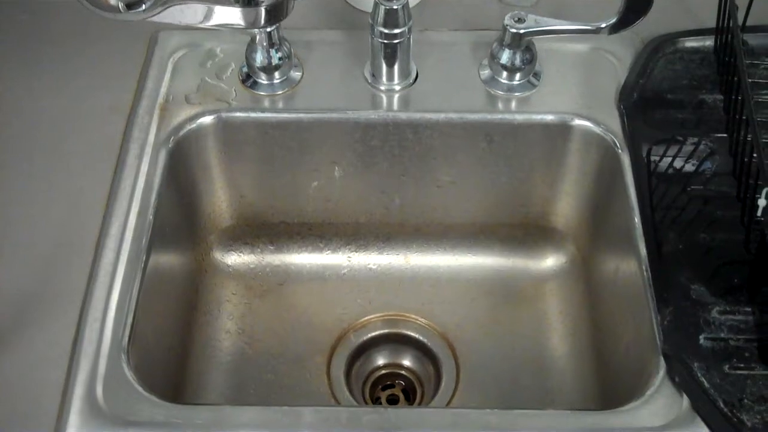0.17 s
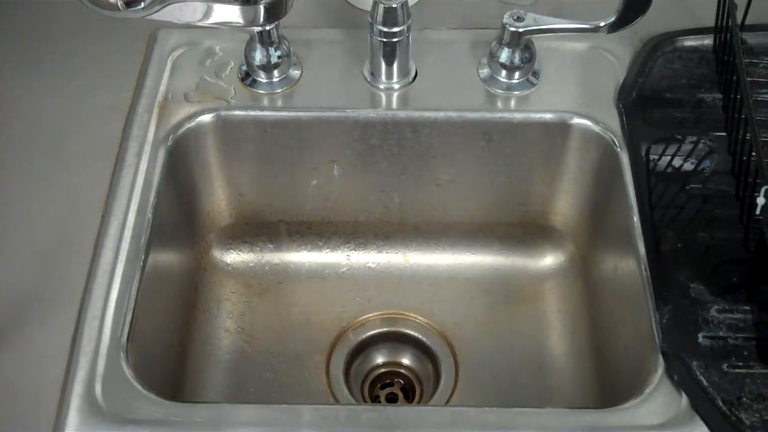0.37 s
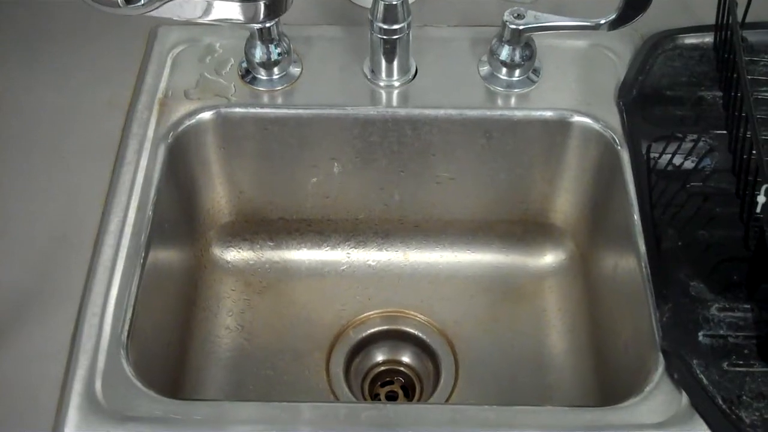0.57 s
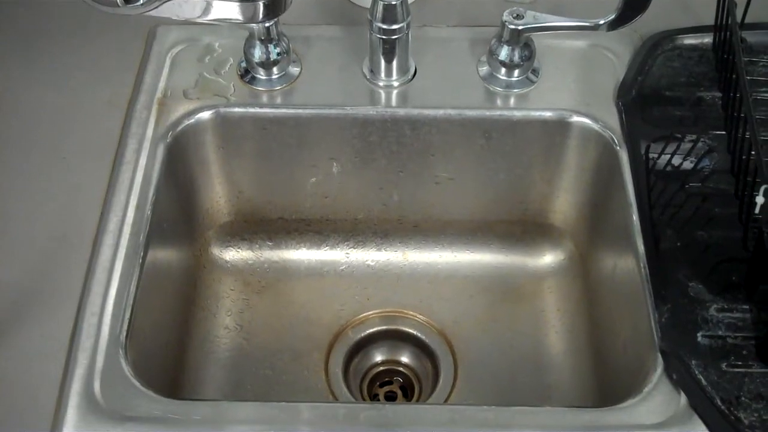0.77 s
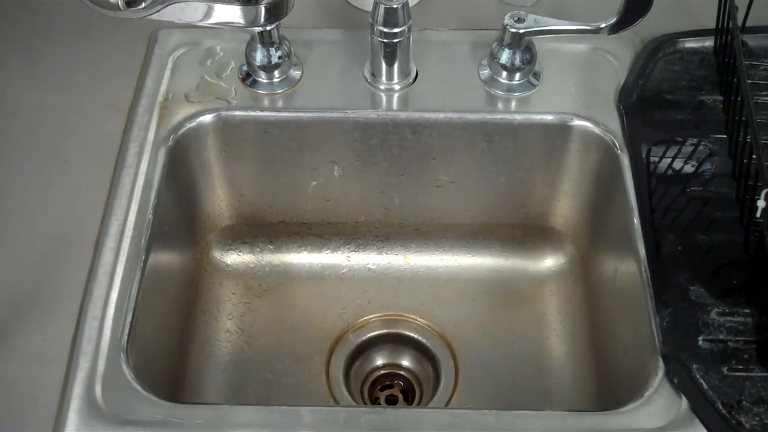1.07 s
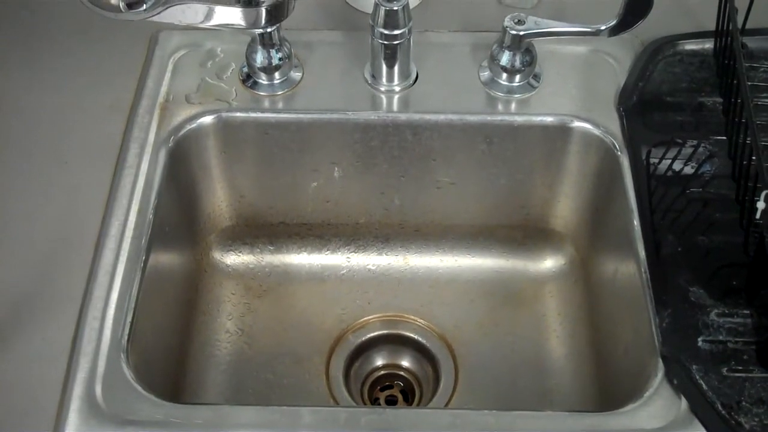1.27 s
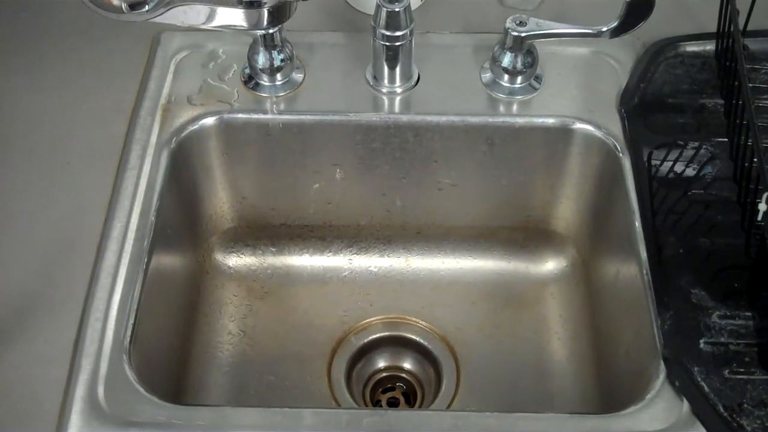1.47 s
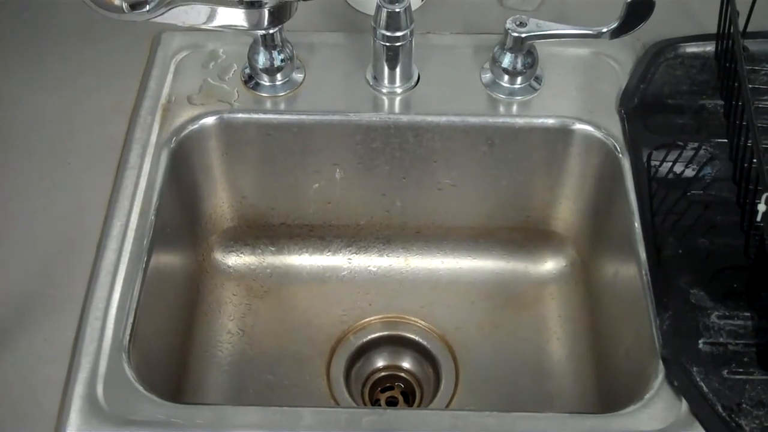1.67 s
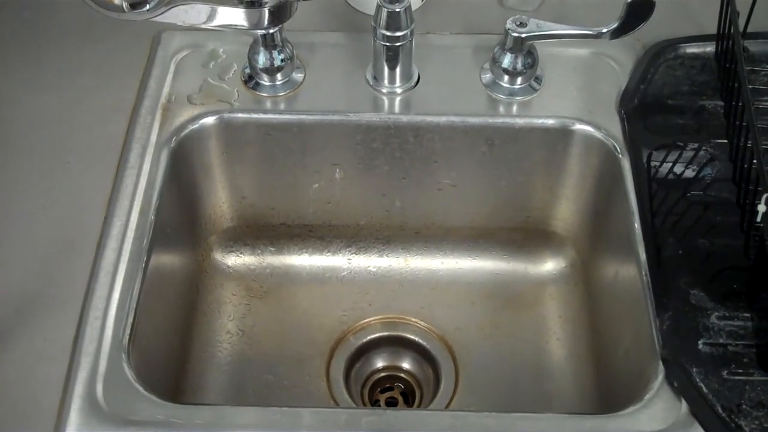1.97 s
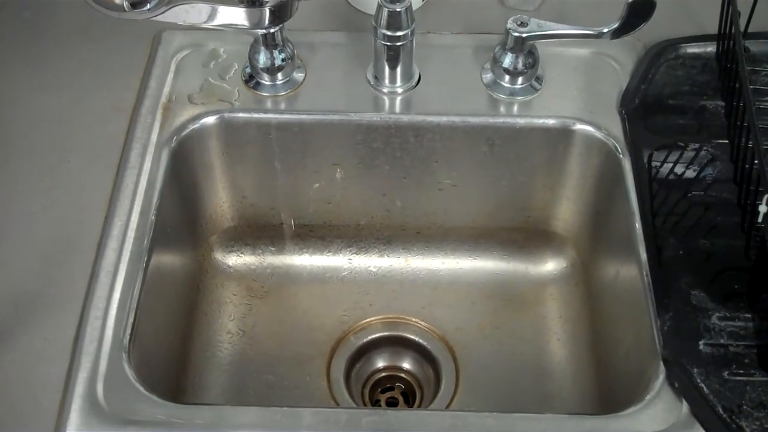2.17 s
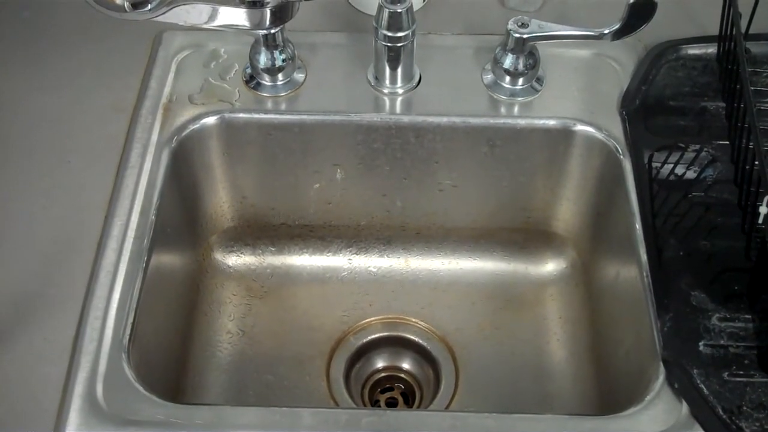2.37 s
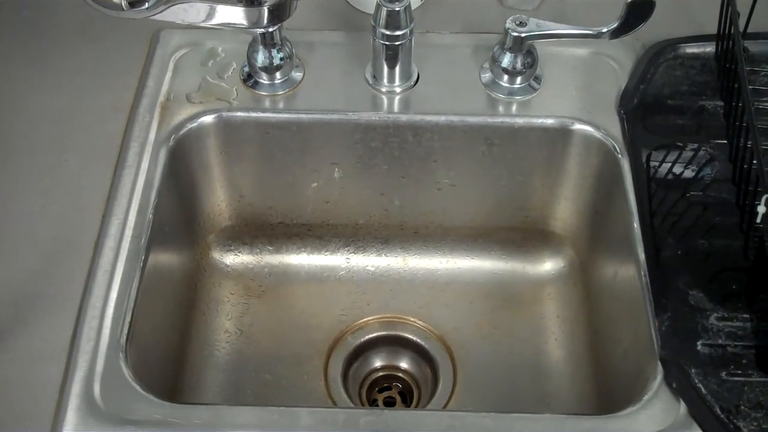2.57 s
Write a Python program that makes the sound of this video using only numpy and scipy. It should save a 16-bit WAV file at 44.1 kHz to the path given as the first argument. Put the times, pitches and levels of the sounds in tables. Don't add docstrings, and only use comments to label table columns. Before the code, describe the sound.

Water drips slowly in a small quiet kitchen, close up in stereo. After brief silence and a hard input pop, drain plinks alternate with metallic slaps on the basin, over soft hiss, hum and a faint fridge whine.

```python
import sys
import numpy as np
from scipy import signal
from scipy.fft import rfft, irfft
from scipy.io import wavfile
from scipy.ndimage import uniform_filter1d

SR = 44100
rng = np.random.default_rng(int(sys.argv[2]) if len(sys.argv) > 2 else 0)


def magnitude_from_level(level_db):
    exponent = np.asarray(level_db, float) / 20
    return 10 ** exponent


def file_out(sig):
    cols = np.atleast_2d(sig).T
    lim = np.clip(cols, -1, 1)
    pcm = np.round(lim * 32767).astype(np.int16)
    wavfile.write(sys.argv[1], SR, pcm)


N = 119952
PORTS = np.array([[1], [-1]])
HALF = PORTS / 2
WAKE_S, OPEN_S = 0.086232, 0.108832


def walk(rate_hz):
    k = int(SR / rate_hz)
    steps = np.repeat(rng.standard_normal(N // k + 1), k)
    return 1.14 * uniform_filter1d(uniform_filter1d(steps, k), k)[:N]


def place(times, rows):
    out = np.zeros(N + rows.shape[1])
    for s, row in zip(times, rows):
        start = int(s * SR)
        out[start:start + len(row)] += row
    return out[:N]


def high(x, hz):
    return signal.sosfilt(signal.butter(2, hz, "high", fs=SR, output="sos"), x)


def taps(db, length_s, push=1):
    u = np.arange(882) / SR
    swell = 1 - np.exp(-u / 0.0001)
    spray = 0.61 * rng.standard_normal((len(db), 882)) * np.exp(-u / length_s) * swell
    return magnitude_from_level(np.array(db))[:, None] * (spray / np.sqrt(length_s * SR) + push * (u == 0))


def bubbles(hz, db):
    cycles, glide = 7.5, 0.2
    hz, db = hz[:, None], db[:, None]
    age = np.arange(882) / SR * hz / cycles
    turns = cycles * age * (1 + glide * (age - 1) / 2)
    return magnitude_from_level(db) * np.sin(2 * np.pi * turns) * age * np.exp(-2 * age)


def ring(x, modes, pan_db, neighbour_db):
    u = np.arange(SR // 4) / SR
    body = 0
    for k, (hz, db, t60, lead) in enumerate(modes):
        fade = (-1) ** k * magnitude_from_level(db - 60 * u / t60) * (1 - np.exp(-u / 0.00073))
        body = body + fade * np.sin(2 * np.pi * hz * u + lead * HALF)
        for side, (shift, turn) in zip((-0.66, 1.08, -2.19, 1.99), rng.uniform(0.49, 1, (4, 2))):
            near_hz = hz * (1 + 0.039 * side * shift)
            phase = 2 * np.pi * (near_hz * u + (1 - turn) / 2) - lead * side * HALF
            body = body + magnitude_from_level(neighbour_db * abs(side)) * fade * np.sin(phase)
    return signal.fftconvolve(x[None], body * magnitude_from_level(pan_db * HALF), axes=1)[:, :N]


HISS_TOP_HZ = 14250
# frequency in Hz, density in dB per Hz.
TONE_MID = [(25, -22), (70, -3.5), (150, -11.5), (200, -1), (700, -5), (1500, -11.5), (2600, -21.5),
            (14000, -35)]
# frequency in Hz, density in dB per Hz.
TONE_SIDE = [(25, -14), (70, -29), (150, -19), (200, -24), (700, -18), (1500, -15.5), (2600, -22.5),
             (14000, -34)]
# frequency in Hz, width in Hz, gain in dB.
TONE_PEAKS = [(60, 25, -4.5), (309, 58, 3.5), (425, 10, 3), (548.6, 4.7, 11.5), (1087, 16, -2.5),
              (2120, 90, -1), (6430, 170, 6), (7310, 2100, 5)]


def room_tone():
    f = np.maximum(np.fft.rfftfreq(N, 1 / SR), 1)
    peaks_db = sum(db / (1 + (2 * (f - hz) / width) ** 2) for hz, width, db in TONE_PEAKS)
    tone = []
    for curve in (TONE_MID, TONE_SIDE):
        hz, db = np.array(curve).T
        colour = magnitude_from_level(np.interp(np.log(f), np.log(hz), db) + peaks_db) * (f < HISS_TOP_HZ)
        tone.append(irfft(rfft(rng.standard_normal(N)) * colour, N))
    level_db = -49.5 + 0.39 * walk(5.8)
    mid, side = np.array(tone) * magnitude_from_level(level_db) / np.std(tone[0])
    tilt = signal.lfilter([0.2], [1, -0.8], mid) * (magnitude_from_level(-4 / 2) - 1)
    return mid + PORTS * (side + tilt)


# frequency in Hz, level in dB rms, left lead in radians, left over right in dB.
WHINE = [(30, -91.5, 0., -3), (58.5, -72.5, 0.75, -5), (82.4, -73.5, 0.34, -4), (560, -64, 0.0083, 2),
         (197.9, -61.5, 0.22, -2), (1310, -87, 2.7, -4), (1278.6, -58.5, 0.34, -7), (1580, -78, 1.8, -10),
         (1628, -67.5, 1.1, -6), (1937, -72.5, 1.9, 8)]


def fridge():
    out = np.zeros((2, N))
    for hz, db, lead, pan_db in WHINE:
        phase = 2 * np.pi * np.cumsum(hz * (1 + 0.00053 * walk(1.89))) / SR
        level = np.sqrt(2) * magnitude_from_level(db + pan_db * HALF + walk(5.9))
        out += level * np.sin(phase + lead * HALF)
    return out


def kitchen(x):
    t60_s, tail_db = 0.19, -9.5
    u = np.arange(int(0.4 * SR)) / SR
    tail = rng.standard_normal((2, len(u))) * np.exp(-np.log(1000) * u / t60_s) * (u > 0.004)
    tail *= magnitude_from_level(tail_db) / np.sqrt(np.sum(tail ** 2, axis=1, keepdims=True))
    return x + signal.fftconvolve(x.mean(axis=0, keepdims=True), tail, axes=1)[:, :N]


# start in seconds, frequency in Hz, level in dB.
SPECKS = [
    (.42, 6560, -48),
    (.668, 3970, -50),
    (.765, 7600, -45.5),
    (1.267, 9500, -44),
]


def specks():
    s, hz, db = np.array(SPECKS).T
    return magnitude_from_level(9.5) * place(s, bubbles(hz, db)) * np.array([[1], [0.7]])


# start in seconds, tick level in dB, bubble frequency in Hz, bubble level in dB.
PLINKS = [
    (0.3092, -39, 1605, -29.5),
    (0.8184, -36, 1934, -31.5),
    (1.3224, -28, 2046, -24),
    (2.2975, -36.5, 6350, -15.5),
    (2.6723, -45.5, 2920, -40.5),
]
# frequency in Hz, level in
# dB, 60 dB fade in seconds, left lead in radians.
DRAIN = [(1549, -2, 0.1, 0.55), (1630, -16, 0.22, -0.43), (1710, -11.5, 0.066, -0.99),
         (1800, 4.5, 0.028, -1.1), (1960, -6.5, 0.038, .3), (2102, -4.5, 0.047, -0.12),
         (2950, -3, 0.05, 0.17), (4910, 3, 0.0097, -0.42), (5670, -10.5, 0.037, -1.5),
         (6000, -26, .06, 0.77), (6320, -2.5, 0.029, 0.069), (7220, -5, 0.038, 0.19), (7400, -10, .04, 3.4),
         (8850, -8.5, .012, -0.78)]


def plinks():
    s, tick_db, hz, bubble_db = np.array(PLINKS).T
    tick = high(high(place(s, taps(tick_db, 0.0016)), 4540), 2200)
    air = place(s, bubbles(hz, bubble_db))
    drain = ring(magnitude_from_level(-5.5) * tick + magnitude_from_level(-26) * air, DRAIN, pan_db=0.5, neighbour_db=-8)
    return drain + magnitude_from_level(-1.5) * air


# start in seconds, level in dB.
SLAPS = [
    (0.572, -28.5),
    (1.187, -30),
    (1.804, -30),
    (2.416, -31.5),
]
# start in seconds, level in dB.
SATELLITES = [
    (0.604, -41),
    (1.2202, -41),
    (1.8336, -37.5),
    (2.4495, -40.5),
]
# frequency in Hz, level in dB, 60 dB fade in seconds, left lead in radians.
BASIN = [(746.3, -8, 0.21, 0.025), (812, -10.5, 0.24, -0.24), (922, -8, 0.12, -0.16), (1088, -7, 0.14, .4),
         (1307, -8, 0.12, 0.22), (2277, -6, 0.06, 0.27), (3170, -11.5, .06, 0.38),
         (3630, -4.5, 0.043, 0.46), (4078, -7.5, 0.045, 0.13), (4610, -9, 0.069, 1.6),
         (5400, -18, 0.059, -0.3), (6010, 0.5, 0.033, 1.25), (7060, 3.5, 0.022, -1.1),
         (7380, 0, 0.022, 0.25)]


def slaps():
    s, db = np.array(list(SLAPS) + list(SATELLITES)).T
    first = len(SLAPS)
    band = signal.butter(2, (2800, 9500), "band", fs=SR, output="sos")
    splash = signal.sosfilt(band, [place(s, taps(db + 19.5, 0.0084, push=0)) for _ in range(2)])
    drops = taps(db[:first], 0.0019)
    satellites = magnitude_from_level(5) * taps(db[first:], 0.0041, push=0.25)
    blows = high(place(s, np.r_[drops, satellites]), 605)
    return magnitude_from_level(-9.5) * ring(blows, BASIN, pan_db=-2.5, neighbour_db=-5) + splash


def scene():
    top = signal.butter(6, HISS_TOP_HZ - 1250, fs=SR, output="sos")
    drips = signal.sosfilt(top, kitchen(slaps() + plinks() + specks()))
    return drips + room_tone() + fridge()


# time after the first edge in ms, voltage with full scale at 1.
POP = [
    (0, .70),
    (.62, .725),
    (.8, .555),
    (1.6, .58),
    (2.3, .63),
    (3.2, .6),
    (10.8, .465),
    (16.8, .36),
    (22.62, .305),
]


def pop():
    t = np.arange(N) / SR
    right_s = WAKE_S - 0.000028

    def edge(s, rise_s=1 / SR):
        return np.clip((t - s) / rise_s + 0.5, 0, 1)

    ms, volt = np.array(POP).T
    sag = np.interp(t, WAKE_S + ms / 1000, volt)
    right = np.interp(t, [WAKE_S, OPEN_S], (1.055, 1.012))
    shut = 1 - edge(OPEN_S + 0.0000008 * PORTS, 1.5 / SR)
    held = np.array([edge(WAKE_S, 0.00005), -right * edge(right_s)]) * sag * shut
    held[1, int(0.08783 * SR) + np.array([0, 2, 4])] += 0.05 * np.array([-1, 1, -1])
    near = t - right_s
    held[1] -= 0.085 * np.sin(2 * np.pi * 13800 * near) * np.exp(-abs(near) / 0.00012)
    u = np.maximum(t - OPEN_S, 0) / 0.0725
    settling = -0.091 * (1 + u) * np.exp(-u) * (1 - shut)
    return held + PORTS * settling


def low_pass(x):
    return signal.sosfilt(signal.butter(12, 16760, fs=SR, output="sos"), x)


def record(dry):
    t = np.arange(N) / SR
    bass = signal.sosfiltfilt(signal.butter(4, 115, fs=SR, output="sos"), dry)
    back_from_s, back_by_s = 0.2, 0.36
    missing = np.clip((back_by_s - t) / (back_by_s - back_from_s), 0, 1)
    x = (dry - missing * bass) * (t > OPEN_S) + pop()
    x = signal.sosfiltfilt(signal.butter(8, 15800, fs=SR, output="sos"), x)
    return low_pass(x)


dry = scene()
out = record(dry)
file_out(out)
```